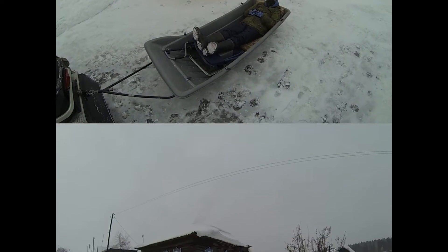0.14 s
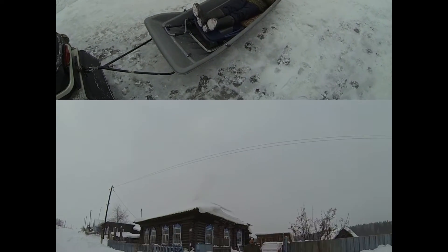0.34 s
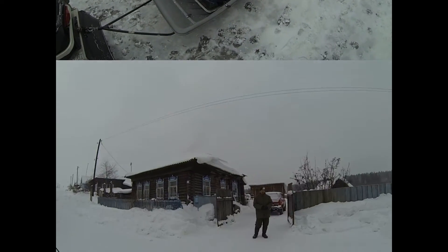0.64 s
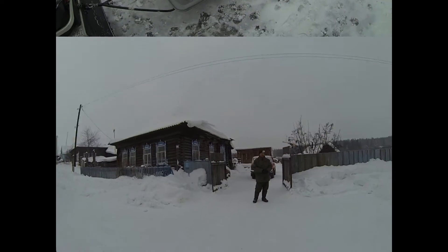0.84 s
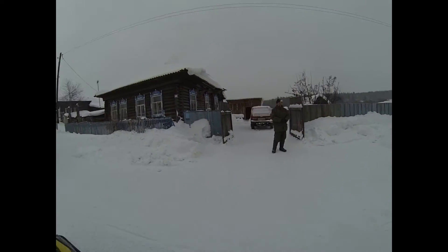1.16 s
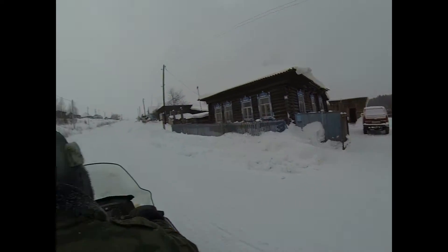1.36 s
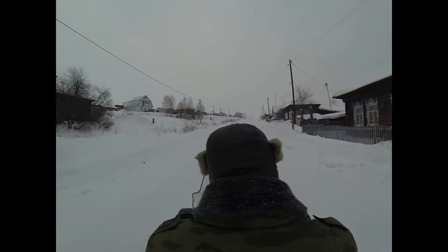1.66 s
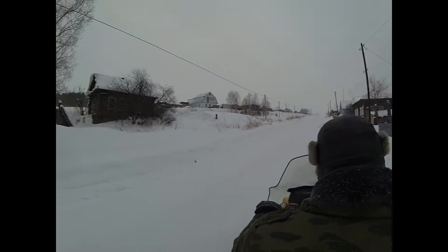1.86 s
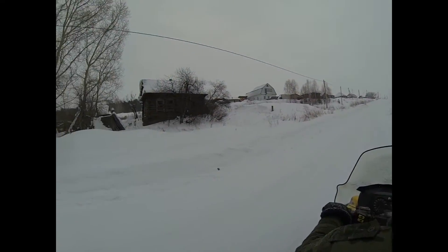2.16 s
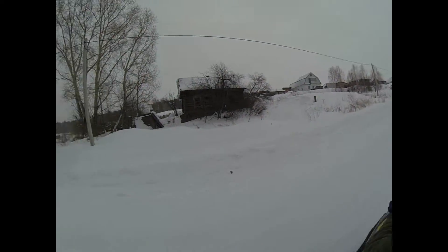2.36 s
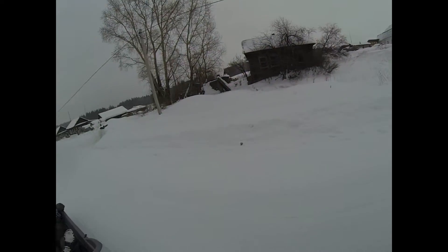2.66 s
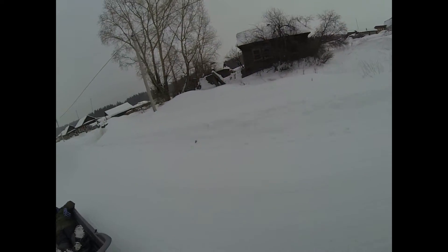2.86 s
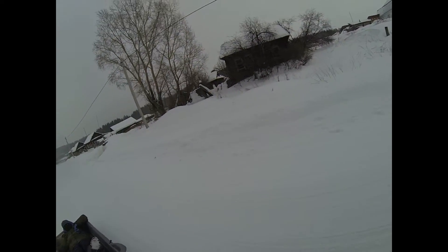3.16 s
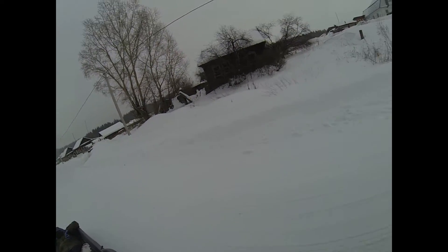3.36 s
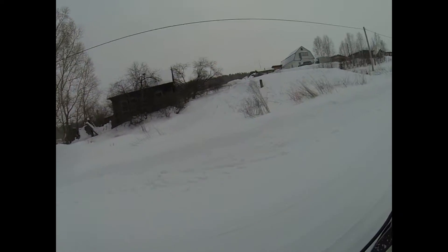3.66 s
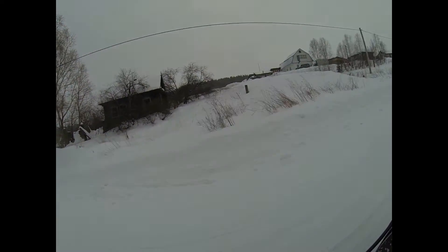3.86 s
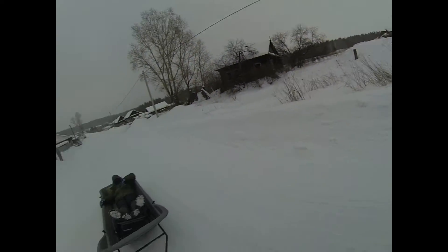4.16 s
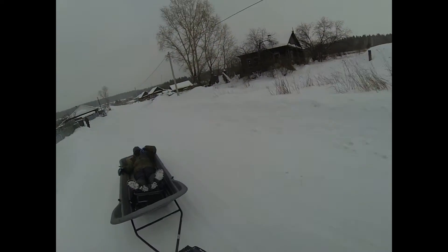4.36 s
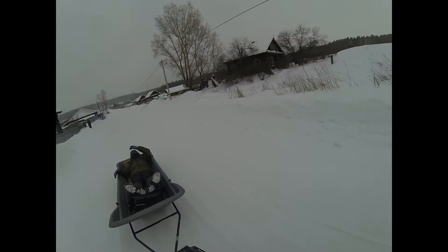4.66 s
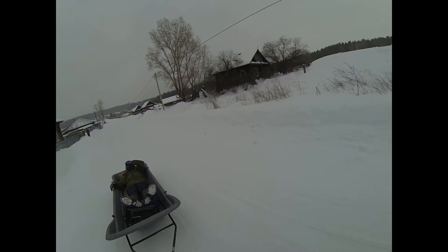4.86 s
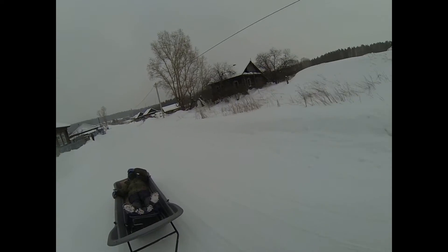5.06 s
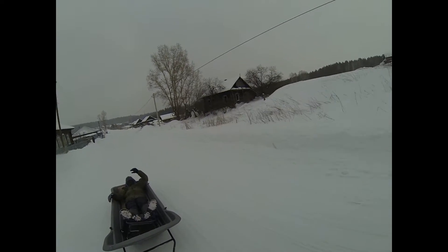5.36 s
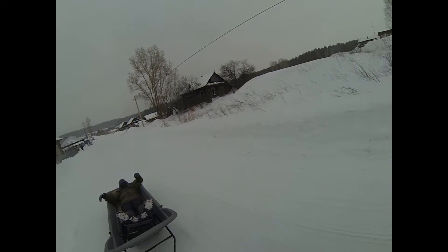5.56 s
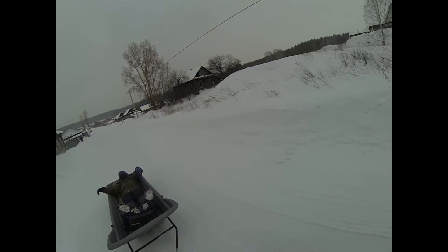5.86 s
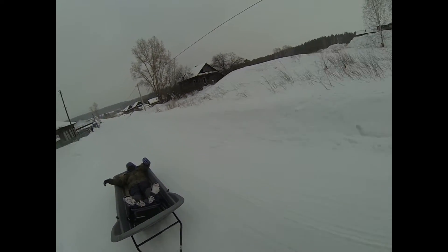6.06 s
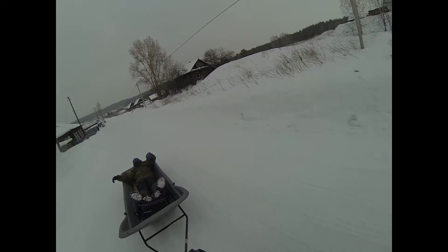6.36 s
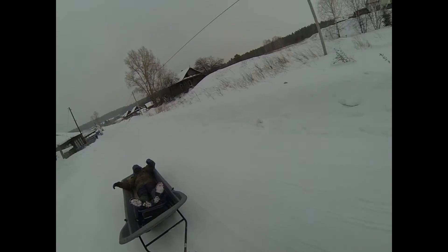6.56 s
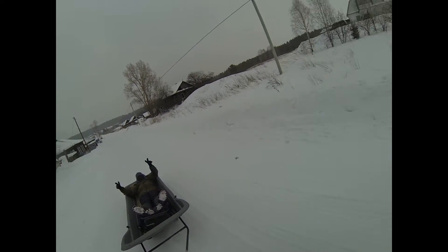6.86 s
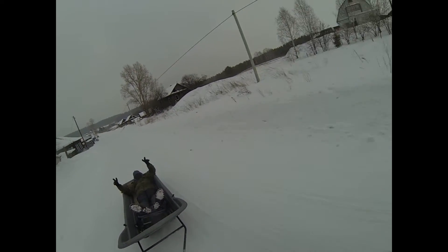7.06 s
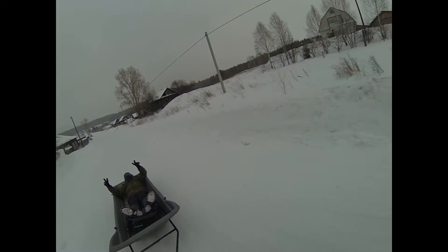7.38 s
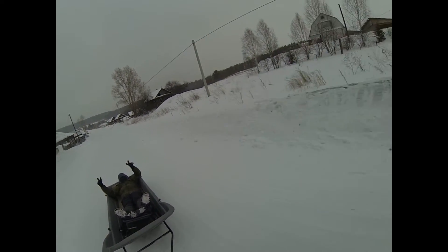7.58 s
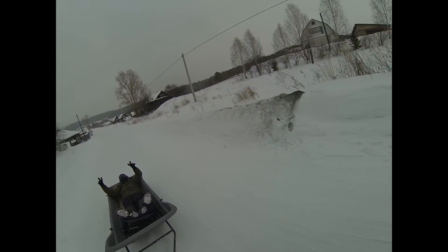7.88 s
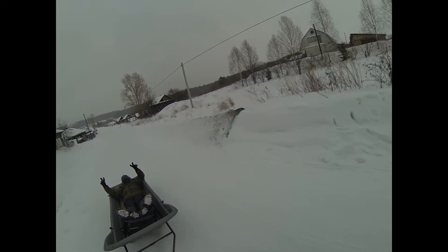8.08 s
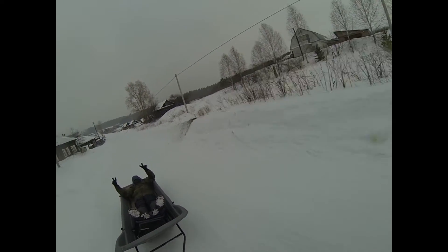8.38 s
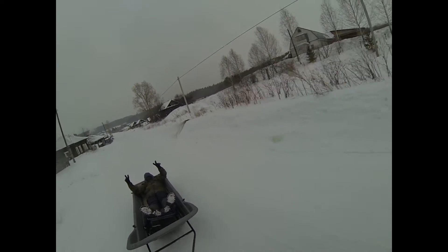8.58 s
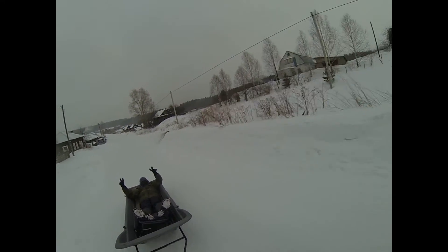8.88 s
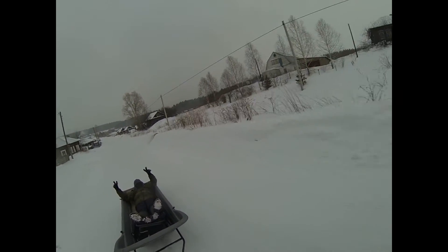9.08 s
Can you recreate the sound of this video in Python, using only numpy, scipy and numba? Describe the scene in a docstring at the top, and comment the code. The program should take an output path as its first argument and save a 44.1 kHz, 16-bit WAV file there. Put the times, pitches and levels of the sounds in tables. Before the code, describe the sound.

From 0 to 0.19 s, close, grainy rubbing on the camera housing ends in a small click with a faint ring; a tiny silence follows until 0.22 s. The ride then fades in fast: a two-cylinder snowmobile engine, fairly quiet and low, with track and snow noise. From about 1.2 s wind hits the microphone with the first hard thumps. The exhaust climbs, buzzing and pulling hardest between 2 and 3 s, with a track hum rising alongside. From 3 s constant wind rumble, deep buffets and sharp thumps overload the microphone and make the level duck. Crunchy snow crackle, spray hiss, dull cowling knocks and thin metal ticks continue. Around 5.5 to 6 s the engine surges to a higher pitch, then runs steadily, more buried under wind, with a slight easing towards the abrupt end at 9.2 s. Outdoors, dry, microphone aboard, treble dulled.

```python
"""First comes grainy rubbing and clicking on the camera housing, right at the microphone, then a short silence.
Then the ride fades in quickly: the camera is aboard a snowmobile that pulls away with a sled. A two-cylinder
exhaust, built from crankshaft orders, climbs in pitch over shaped noise for track, snow and spray, a track hum,
snapping crust and rattling parts. Head wind, as rumble, buffeting and pressure spikes, thumps the microphone
so hard that the gain control ducks."""
import sys
import numpy as np
from scipy import signal
from scipy.fft import rfft, irfft, next_fast_len
from scipy.io import wavfile
from scipy.ndimage import map_coordinates
from numba import njit

SR = 44100
rng = np.random.default_rng(int(sys.argv[2]) if len(sys.argv) > 2 else 0)


def generate_wav(sig):
    """Save sig (samples, or channels by samples) to the path in sys.argv[1] as 16-bit PCM at SR."""
    pcm = np.round(np.clip(np.atleast_2d(sig).T, -1, 1) * 32767).astype(np.int16)
    wavfile.write(sys.argv[1], SR, pcm)


def to_linear_factor(level_db):
    """Convert decibel levels (scalar or array-like) to linear amplitude factors."""
    exponent = np.asarray(level_db, float) / 20
    return 10 ** exponent


N = 407043
T = np.arange(N) / SR


def unit(x):
    """Scaled to rms 1."""
    return x / np.sqrt(np.mean(x ** 2) + 1e-20)


def curves(rows):
    """One value per sample for each column after the time."""
    s, *cols = np.transpose(rows)
    return [np.interp(T, s, c) for c in cols]


def wobble(rate):
    """A smooth random curve, rate knots a second."""
    knots = rng.standard_normal(int(N * rate / SR) + 4)
    return map_coordinates(knots, [T * rate])


def filtered(x, response):
    """x times a complex response of frequency."""
    m = next_fast_len(N + 8192)
    return irfft(rfft(x, m) * response(np.fft.rfftfreq(m, 1 / SR)), m)[:N]


def coloured(spectrum):
    """Noise of rms 1 with the spectral shape of (f/Hz, level/dB) points, joined over log frequency."""
    f, db = np.transpose(spectrum)
    return unit(filtered(rng.standard_normal(N), lambda hz: to_linear_factor(np.interp(np.log(hz + 1), np.log(f + 1), db))))


def resonances(modes):
    """Causal response of a body with (f/Hz, width/Hz, level/dB) modes of alternating sign."""
    def response(f):
        total = 0
        for k, (centre, width, db) in enumerate(modes):
            damping = 1j * f * width
            total = total + (-1) ** k * to_linear_factor(db) * damping / (centre * centre - f * f + damping)
        return total
    return response


def ticks(rows, t60):
    """Short blows, a push with grit on it, at (t/s, level/dB), falling 60 dB in t60 seconds."""
    out, t = np.zeros(N + 1024), np.arange(1024) / SR
    for s, db in rows:
        grit = 1 + .5 * rng.standard_normal(1024)
        out[round(s * SR):][:1024] += to_linear_factor(db - 60 * t / t60) * grit
    return out[:N]


def thumps(rows, lead=0.22):
    """Each eddy pushes the diaphragm slowly one way, snaps it back in a sharp spike, then settles."""
    out, t = np.zeros(N + 4096), np.arange(-2048, 2048) / SR
    for s, peak, ms in rows:
        u = t / (ms / 1000)
        spike = (1 + u * u) ** -1.5
        slow_push = lead * np.exp(-((u + 3) / 2.43) ** 2)
        settling = 0.31 * np.exp(-((u - 3.5) / 3.1) ** 2)
        out[round(s * SR):][:len(t)] += peak * (spike - slow_push - settling)
    return out[2048:][:N]


# head wind at the microphone: (t/s, wind level/dB, deep buffet level/dB)
WIND_LEVELS = [(.24, -45, -51), (.65, -26.5, -44), (1.1, -23, -44), (1.3, -20, -24), (1.55, -14.5, -16),
               (2.4, -16.5, -23), (2.6, -24.5, -34.5), (3.0, -20, -20.5), (3.7, -22.5, -22),
               (4.35, -16.5, -25), (5.0, -17, -26), (5.5, -19, -14), (6.3, -17.5, -29), (6.9, -17.5, -20),
               (7.5, -20.5, -16), (8.05, -14, -19), (8.5, -15, -17), (8.8, -15.5, -19),
               (8.87, -19.5, -26.5), (9.2, -17.5, -19.5)]
# shape of the wind rumble: (f/Hz, relative level/dB)
RUMBLE_SPECTRUM = [(20, -22.5), (45, -9), (90, 0.5), (180, -8), (350, -14), (640, -27), (1000, -29.5),
                   (2000, -100)]
# shape of the deep buffeting: (f/Hz, relative level/dB)
BUFFET_SPECTRUM = [(8, -36.5), (18, -0.5), (40, -1.5), (70, -22.5), (200, -100)]
# strong thumps on the diaphragm: (t/s, signed spike size, spike width scale/ms)
STRONG_THUMPS = [(.737, 0.5, 1.1), (1.2842, 1, 2.4), (1.3008, 1, 0.99), (1.4333, -0.5, 0.4),
                 (1.5739, -0.3, 1.8), (1.7667, 0.2, 1.3), (1.7913, 0.5, 1.3), (2.0049, 0.8, 2),
                 (2.0325, 0.5, 2.6), (2.127, -0.5, 1.4), (2.2364, 0.6, 2.5), (2.2777, 0.5, 2.6),
                 (2.3083, 0.3, 0.69), (2.7592, -2, 2.45), (2.9578, -0.6, 1.3), (3.0585, -2.5, 1.8),
                 (3.1851, -2, 2.8), (3.2828, 1.14, 1.2), (3.3548, 1.5, 1.8), (3.4544, 1.2, 0.81),
                 (3.4804, -1.7, 2.2), (3.5491, 0.35, 1.8), (3.6011, -1.8, 1.9), (3.7036, 1.5, 2.4),
                 (3.8647, -1.5, 1.25), (4.0295, 1.2, 1.9), (4.1936, -2, 1.85), (4.3017, 0.8, .9),
                 (4.351, 0.9, 1.4), (4.425, 0, 1.7), (4.5344, -0.7, 1.05), (4.6297, 0.5, 1.1),
                 (4.7052, -1.3, 2), (4.7824, 0.1, 1.9), (4.952, -1.6, 1.5), (5.1107, 0.3, 0.86),
                 (5.2318, 0.3, 0.88), (5.4533, -0.5, 1.3), (5.5954, -0.9, 1.5), (5.7195, 0, 1.3),
                 (5.7445, 1.4, 1.1), (5.8688, -2, 1.3), (6.033, -0.5, 1.5), (6.0642, -1, 0.83),
                 (6.1582, 0.7, 1.1), (6.2866, 1.1, 4.1), (6.561, -1.3, 1.3), (6.758, -1, 1.15),
                 (6.8864, -2, 0.68), (6.9409, -1.5, 1.6), (7.0499, 0.5, .8), (7.1726, 1.84, 2.2),
                 (7.3592, -1.5, 0.61), (7.4275, 1.8, 2.45), (7.6575, -2, 3.04), (7.8949, -0.8, 1.9),
                 (8.0242, 1, 2.2), (8.0505, 0.3, 1.3), (8.1119, -1.5, 1.5), (8.259, -1.7, 2.3),
                 (8.3341, -1.8, 1.2), (8.5319, -1, 3.3), (8.5957, 1.2, 0.56), (8.6367, 0.7, 0.78),
                 (8.724, -1.7, 1.2), (8.8306, -2.5, 2.4), (9.1376, -0.6, 1.1)]


def wind(gust, count=1300):
    """Lumpy rumble, deep buffeting and a crowd of small eddies under the strong thumps."""
    level_db, deep_db = curves(WIND_LEVELS)
    when, side, chance, spread = rng.random((count, 4)).T
    size = np.where(side < .62, -1, 1) * np.minimum(-np.log(chance), 1.8)
    width_ms = 0.63 * np.exp(1.59 * spread)
    eddies = unit(thumps(np.transpose([when * (N - 1) / SR, size, width_ms])))
    lumps = to_linear_factor(1.4 * wobble(13) + 2.4 * gust + 2.6 * wobble(40))
    rumble = unit(lumps * coloured(RUMBLE_SPECTRUM))
    buffet = unit(to_linear_factor(1.9 * wobble(16)) * coloured(BUFFET_SPECTRUM))
    steady = to_linear_factor(level_db) * (to_linear_factor(-0.63) * rumble + to_linear_factor(1.5) * eddies)
    return steady + to_linear_factor(deep_db) * buffet + thumps(STRONG_THUMPS)


# track and snow under the machine: (t/s, relative roar level/dB, spray gain on the top of the roar/dB)
RIDE_LEVELS = [(.24, -46, 2.5), (.55, -37, 3), (.85, -33.5, 2.5), (1.26, -24.5, 2), (1.45, -23.5, -4),
               (1.62, -27.5, -3), (2.0, -28, 1.5), (2.28, -29.5, 4.5), (2.36, -26.5, 4), (2.5, -29, 8),
               (2.7, -22, 7.5), (3.05, -27.5, 5.5), (3.3, -26.5, 5.5), (3.65, -31.5, 3.5),
               (3.95, -30.5, 5.5), (4.18, -26.5, 8), (4.3, -31, 2.5), (4.78, -34, 4.5), (4.93, -27, 3.5),
               (5.02, -34, 7), (5.4, -34.5, 5.5), (5.85, -25.5, -2), (6.05, -32, 6), (6.25, -34, 6),
               (6.42, -31, 6), (6.55, -29.5, 5.5), (6.7, -34.5, 10), (7.0, -33.5, 7.5), (7.3, -33.5, 9.5),
               (7.63, -32, 10.5), (7.95, -29.5, 7.5), (8.3, -29, 9), (8.55, -29, 9), (8.82, -30.5, 8),
               (8.85, -33.5, 8), (9.0, -37, 8.5), (9.2, -31, 3.5)]
# shape of the roar of track, belt and snow: (f/Hz, relative level/dB)
ROAR_SPECTRUM = [(100, -9.5), (200, -5.5), (400, -5.5), (800, -13), (1200, -17), (1800, -24), (3000, -36),
                 (4200, -47), (5500, -51), (7000, -57), (10000, -56.5), (12500, -59.5), (15000, -85),
                 (20000, -120)]


def roar(turns, gust, gate=0.17, split_hz=3000):
    """Track and snow noise, puffed twice a turn by the firing and swelling with gusts; spray lifts its top."""
    level_db, spray_db = curves(RIDE_LEVELS)
    puff = 1 + gate * np.cos(4 * np.pi * turns)
    noise = coloured(ROAR_SPECTRUM)
    top = filtered(noise, lambda f: 1 / (1 + (split_hz / (f + 1)) ** 4))
    noise = noise + (to_linear_factor(spray_db) - 1) * top
    return to_linear_factor(level_db + 7.5 + 1.5 * gust + 1.0 * wobble(45)) * puff * noise


# snow crusts of three sizes: (f/Hz, width/Hz)
CRUSTS = [(1300, 1100), (2400, 1700), (4200, 3000)]


def crackle():
    """Snow crust snaps under skis and sled in short irregular grains; small crusts are higher and fainter."""
    rate_per_s, spread_db = 130, 4  # rate of each crust size
    roar_db, _ = curves(RIDE_LEVELS)
    out = 0
    for hz, width_hz in CRUSTS:
        when, size = rng.random(N), rng.exponential(size=N)
        snaps = (when < rate_per_s / SR) * to_linear_factor(spread_db * np.minimum(size, 3))
        body = resonances([(hz, width_hz, 0)])
        out = out + (1000 / hz) ** 2.03 * unit(filtered(snaps, lambda f: body(f) ** 2))
    fade_in = np.clip(T - 2, 0, 1)
    return to_linear_factor(roar_db - 8.5) * fade_in * out


# loose parts knocking on the cowling: (t/s, blow level before the body rings/dB)
KNOCKS = [(.437, -41), (3.249, -12), (3.597, -11.5), (4.345, -14), (5.057, -30), (5.108, -13.5),
          (5.228, -19), (5.338, -14.5), (5.56, -15), (6.407, -13), (7.748, -20), (7.94, -16), (8.049, -19),
          (8.132, -12.5), (8.164, -19), (8.593, -13), (8.925, -13.5), (8.946, -20)]
# small metal parts ticking: (t/s, blow level before the part rings/dB)
METAL_TICKS = [(1.038, -37), (1.048, -30), (1.344, -33), (3.598, -35), (3.70, -34.5), (4.348, -32),
               (5.11, -33), (5.23, -29), (5.311, -36), (5.339, -32), (6.062, -32), (6.409, -35),
               (7.822, -33), (7.941, -33), (8.165, -32), (8.208, -38), (8.45, -35), (8.925, -32)]


def rattles(count=30):
    """Loose parts give a dull knock on the cowling, small ones at random; metal parts add thin ticks."""
    t60_s, small_db, padding_hz = .006, -26.5, 1500  # padding dulls the knocks
    chance, strength = rng.random((count, 2)).T
    small_s = 1 + chance * (N / SR - 1.1)
    small = list(zip(small_s, small_db + 6 * (strength - .5)))
    cowling, metal = resonances([(650, 1000, 0)]), resonances([(3900, 3000, 0)])
    blows = ticks(KNOCKS + small, t60_s)
    knock = filtered(blows, lambda f: cowling(f) ** 2 / (1 + 1j * f / padding_hz) ** 2)
    tick = filtered(ticks(METAL_TICKS, t60_s), lambda f: metal(f) ** 2)
    return to_linear_factor(15.5) * knock + to_linear_factor(10) * tick


# track lugs passing the drive wheels: (t/s, f/Hz, relative level/dB)
LUGS = [(1.4, 72, -56), (1.8, 84, -31.5), (2.3, 100, -32.5), (2.6, 112, -35), (3.05, 131, -20),
        (3.4, 135, -30), (5.3, 146, -31.5), (5.7, 158, -19), (6.1, 170, -23.5), (6.5, 175, -35),
        (9.23, 172, -40.5)]


def track():
    """A slightly unsteady hum that climbs with ground speed."""
    hz, db = curves(LUGS)
    phase = 2 * np.pi * np.cumsum(hz) / SR + 1.2 * wobble(10)
    hum = np.sin(phase) + to_linear_factor(-12.5) * np.sin(2 * phase)
    return to_linear_factor(db + 2.5 + 4.9 * wobble(3.7)) * hum


# camera housing, touching the microphone: (f/Hz, width/Hz, relative level/dB)
HOUSING_MODES = [(770, 520, -3.5), (1820, 290, 2), (2750, 460, -3), (3870, 340, 1.5), (5450, 580, -4.5),
                 (6460, 1400, -9), (9000, 4500, -10)]
# rubbing on the housing: (t/s, rub level/dB, low sway level/dB)
RUB_LEVELS = [(0, -60, -41.5), (.022, -51, -56), (.03, -39.5, -44), (.07, -37, -53), (.1, -42, -58),
              (.105, -37, -56), (.11, -42, -49), (.116, -39, -51), (.135, -41, -40), (.142, -75, -45),
              (.186, -77, -47)]
# clicks on the housing: (t/s, blow level before the housing rings/dB)
BUTTON_CLICKS = [(.145, -31), (.1555, -18), (.1578, -32)]


def handling():
    """Grainy rubbing rings the housing; a button clicks and leaves a faint ring; hiss and low sway lie under."""
    rub_db, sway_db = curves(RUB_LEVELS)
    housing = resonances(HOUSING_MODES)
    grain = to_linear_factor(2.5 * wobble(130)) * rng.standard_normal(N)
    rub = to_linear_factor(rub_db) * unit(filtered(grain, lambda f: housing(f) ** 2))
    button = resonances([(596, 4.5, 7.0), (760, 8, -1.0), (1210, 470, 0.0), (3700, 700, -23.0)])
    click = to_linear_factor(10.5) * filtered(ticks(BUTTON_CLICKS, .0022), button)
    hiss = to_linear_factor(-56.0) * coloured([(100, 2), (800, 16.0), (3000, -22), (8000, -27), (20000, -71)])
    sway = to_linear_factor(sway_db) * coloured([(15, -0.5), (60, -6.0), (300, -20.5), (1000, -23), (20000, -58.5)])
    return rub + click + hiss + sway


# crankshaft speed: (t/s, f/Hz in turns a second)
CRANK_SPEED = [(.2, 61.1), (.6, 62.73), (.88, 64.88), (1.1, 65.7), (1.35, 66.6), (1.6, 69.78),
               (2.08, 75.76), (2.5, 86), (2.93, 91.17), (3.4, 90.7), (4.13, 96.44), (4.6, 97),
               (5.45, 96.53), (5.92, 106.4), (6.23, 106.6), (6.85, 104.2), (7.35, 107.4), (8, 107.6),
               (9.23, 103.1)]


def crankshaft():
    """Speed in turns a second, and the turns made so far as its running sum."""
    hz, = curves(CRANK_SPEED)
    return hz, np.cumsum(hz) / SR


# the camera swings round, so parts of the note come and go and odd orders gain on even ones:
# (t/s, firing, bark, whine, buzz relative level/dB, odd tilt of the whine/dB, odd tilt of the upper parts/dB);
# a tilt is added to odd orders and taken from even ones; the last one serves buzz, rasp and edge
NOTE_LEVELS = [(.22, -28, -38, -48, -53, -5, 3), (.6, -22.5, -20.5, -31, -43, 3, 1.5),
               (1.1, -18, -18, -39, -38.5, 4, 2.5), (1.5, -14.5, -15, -30, -32, 6, 6.5),
               (1.9, -20, -23, -17.5, -36.5, -2, 6), (2.3, -25, -16.5, -21, -34.5, 7, 5),
               (2.7, -17, -18.5, -23.5, -23.5, 7, 6), (2.85, -17, -19.5, -24.5, -20.5, 3, 6),
               (3.1, -30, -22.5, -29, -38, 8, 6), (3.6, -24, -26.5, -30.5, -49, 3, 11.5),
               (4.1, -24, -14, -29, -33.5, 7.5, 7.5), (4.5, -30.5, -34.5, -40, -46.5, 4, 3.5),
               (5.3, -37.5, -20, -35, -55, -4.5, 9), (5.8, -22, -14, -18.5, -36.5, 2, 2),
               (6.2, -35, -23, -28, -41.5, 1.5, 2), (7.5, -33.5, -36, -27, -46.5, 4.5, 9.5),
               (8.2, -25.5, -44, -30.5, -40, 2, 12.5), (9.23, -34.5, -33.5, -37, -50.5, 2.5, 6)]
# the two upper parts of the buzz, which come and go on their own: (t/s, rasp level/dB, edge level/dB)
UPPER_LEVELS = [(.22, -51, -51.5), (.6, -43.5, -40.5), (.9, -41.5, -37.5), (1.25, -40.5, -31.5),
                (1.5, -31.5, -35.5), (1.75, -29.5, -40.5), (2.1, -30, -46), (2.4, -34, -36.5),
                (2.7, -27.5, -29.5), (3.1, -38, -34), (3.6, -42.5, -47), (3.9, -32, -39), (4.2, -32, -37),
                (4.5, -51, -51), (5.4, -49.5, -50), (5.75, -32, -42), (6.05, -42, -35.5), (6.4, -42, -53),
                (7.5, -39.5, -41.5), (9.23, -51.5, -50)]
# the eighth order sings out while the engine pulls hardest: (t/s, level/dB)
PULL_LEVELS = [(1.85, -61), (2.05, -25), (2.4, -24), (2.72, -22.5), (2.8, -62)]
# exhaust and cowling resonances, one list each for boom, bark, whine, buzz, rasp and edge:
# (f/Hz, width/Hz, relative level/dB)
PIPE_MODES = [
    [(195, 44, -1.5), (260, 60, 1), (335, 50, -7)],
    [(448, 38, 0)],
    [(535, 30, -5), (635, 60, -1), (700, 60, -6)],
    [(745, 50, 4), (880, 90, 1)],
    [(1040, 70, 2), (1170, 80, 2)],
    [(1320, 60, -1), (1450, 70, 0), (1585, 90, 1), (1720, 60, -6)],
]
# fixed offset of the odd orders in boom, bark, whine, buzz, rasp and edge: level/dB
ODD_OFFSETS = [-3.5, 0, -6.5, -11.5, -12, -13]


def exhaust(turns, hz, waver_db=2.5, drift=0.06, scatter_db=1.5):
    """Two firings a turn, and higher crankshaft orders as loud as the pipe is at their pitch, all unsteady."""
    firing_db, *middle_db, whine_tilt_db, buzz_tilt_db = curves(NOTE_LEVELS)
    tilts_db = [0, 0, whine_tilt_db[::64]] + 3 * [buzz_tilt_db[::64]]
    # the boom sinks under the firing once the camera faces back
    boom_db = firing_db + np.interp(T, (2, 2.2), [0, -19])
    firing, *parts = to_linear_factor([firing_db, boom_db, *middle_db, *curves(UPPER_LEVELS)])

    pull = to_linear_factor(curves(PULL_LEVELS)[0] + waver_db * wobble(25))
    out = pull * np.sin(16 * np.pi * turns + 0.71 * wobble(16))
    strokes = np.sin(4 * np.pi * turns + 0.21 * wobble(6.8)) + to_linear_factor(-16.5) * np.sin(2 * np.pi * turns)
    out = out + firing * to_linear_factor(-0.5 + waver_db * wobble(11)) * strokes

    for k in range(3, 27):
        f = k * hz[::64]  # pipe gain is worked out every 64 samples
        pipe = 0
        for part, odd_db, tilt_db, modes in zip(parts, ODD_OFFSETS, tilts_db, PIPE_MODES):
            balance_db = odd_db * (k % 2) - tilt_db * (-1) ** k
            for centre, width, db in modes:
                pipe = pipe + part[::64] * to_linear_factor(db + balance_db) / (1 + (2 * (f - centre) / width) ** 2)
        gain = np.repeat(pipe, 64)[:N] * to_linear_factor(waver_db * wobble(9.5))
        out += gain * np.sin(2 * np.pi * k * turns + k * k + drift * k * wobble(9))
    return out * to_linear_factor(scatter_db * wobble(70))  # firings differ in strength


# silent gap between handling and ride: (start t/s, end t/s)
SILENT_GAP = (.187, 0.221)


def scene():
    """Handling, a silent gap, then the ride, with one gust curve shared by roar and wind."""
    hz, turns = crankshaft()
    gust = wobble(30)
    ride = wind(gust) + roar(turns, gust) + crackle() + rattles() + track() + exhaust(turns, hz)
    gap_start, gap_end = SILENT_GAP
    fade_in = np.clip((T - gap_end) / 0.0081, 0, 1)
    return (handling() * (T < gap_start) + ride * fade_in)[None]


@njit
def follow(x, ceiling, attack, release):
    """Gain that falls fast when the sound passes the ceiling and climbs back at a steady dB rate."""
    gain, g = np.empty_like(x), 1.0
    for i in range(len(x)):
        need = ceiling / (abs(x[i]) + 1e-9)
        if need < g:
            g = g + attack * (need - g)
        else:
            g = min(1.0, g * release)
        gain[i] = g
    return gain


def microphone(f):
    """Response that drops steeply at the top, to a low shelf, and gently in the deep bass."""
    deep_bass = 1j * f / (16 + 1j * f)
    top = to_linear_factor(-24.0) + (1 - to_linear_factor(-12.5)) / (1 + (f / 7000) ** 14)
    return deep_bass * top


def roll_off(x):
    """The treble ends steeply here."""
    return signal.sosfilt(signal.butter(12, 15000, fs=SR, output="sos"), x)


def record(dry):
    """Gain control ducks on the thumps, the amplifier rounds off their tips, the microphone shapes the tone."""
    attack_s, release_db_per_s = 0.00089, 70
    x = dry[0] * follow(dry[0], 0.55, 1 / (attack_s * SR), to_linear_factor(release_db_per_s / SR))
    x = x / (1 + np.abs(x / 1.25) ** 8) ** (1 / 8)
    x = filtered(x, microphone)
    return roll_off(x[None])


dry = scene()
out = record(dry)
generate_wav(out)
```